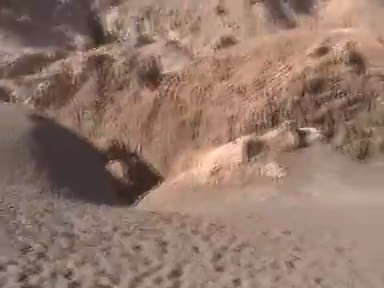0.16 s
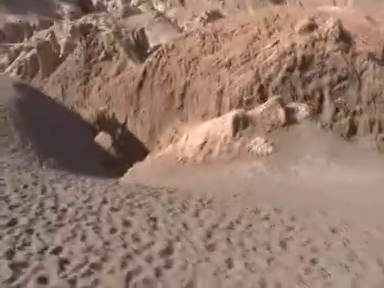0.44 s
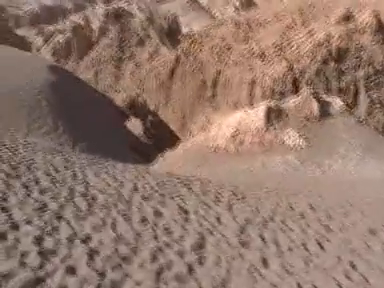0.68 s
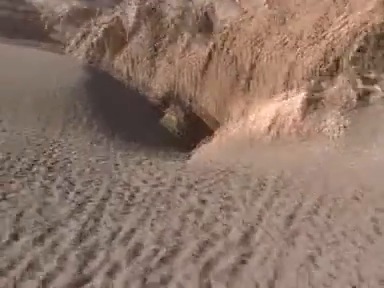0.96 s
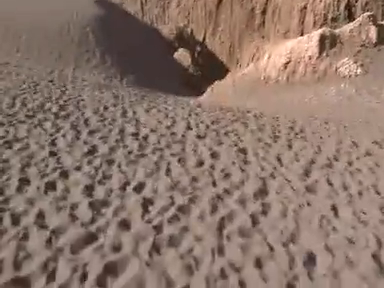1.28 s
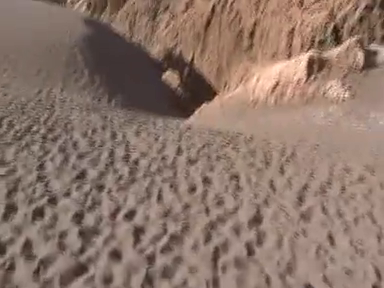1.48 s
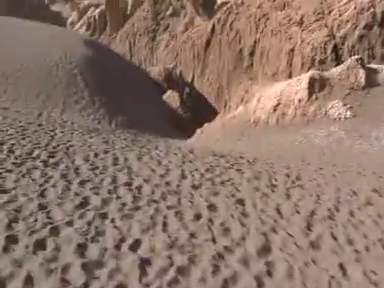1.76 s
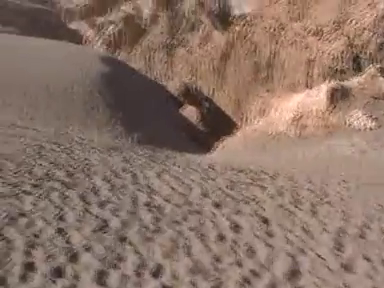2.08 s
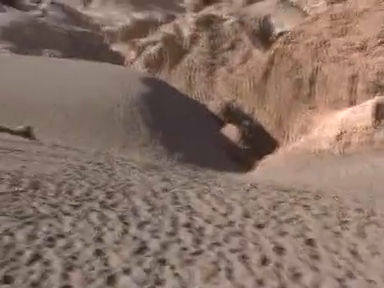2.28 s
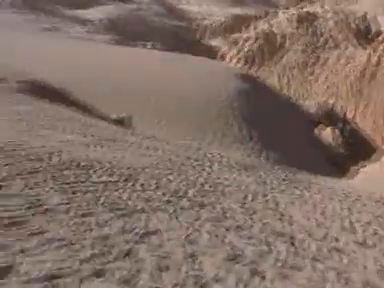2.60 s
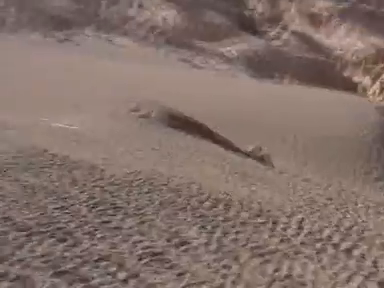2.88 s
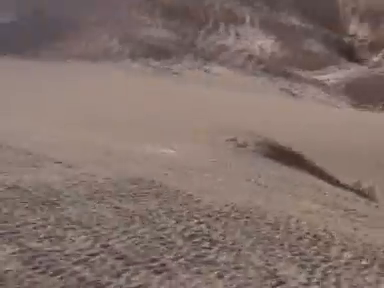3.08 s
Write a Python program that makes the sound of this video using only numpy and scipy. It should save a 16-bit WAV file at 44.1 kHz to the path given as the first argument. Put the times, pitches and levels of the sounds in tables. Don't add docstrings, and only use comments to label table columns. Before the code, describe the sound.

Strong wind roars and flutters against a small microphone in open desert, with sharp ticks and crackles.

```python
import sys
import numpy as np
from scipy import signal
from scipy.fft import rfft, irfft
from scipy.io import wavfile
from scipy.ndimage import uniform_filter1d

SR = 44100
rng = np.random.default_rng(int(sys.argv[2]) if len(sys.argv) > 2 else 0)


def dump(signal):
    limited = np.clip(np.atleast_2d(signal).T, -1, 1)
    pcm = np.round(limited * 32767).astype(np.int16)
    wavfile.write(sys.argv[1], SR, pcm)


def level_to_linear(level):
    exponent = np.asarray(level, float) / 20
    return 10 ** exponent


N = 143325
STEP = 32


def rms_one(x):
    return x / np.sqrt(np.mean(x ** 2) + 1e-20)


def coarse():
    return np.arange(N // STEP + 2) * STEP / SR


def fine(control):
    return np.interp(np.arange(N) / SR, coarse(), control)


def at_hz(points, hz):
    table_hz, values = np.array(points).T
    return np.interp(np.log(hz), np.log(table_hz), values)


def drift(rate_hz):
    pole = np.exp(-2 * np.pi * STEP * rate_hz / SR)
    run_in = 2000
    noise = rng.standard_normal(len(coarse()) + run_in)
    return rms_one(signal.lfilter([1], [1, -2 * pole, pole * pole], noise)[run_in:])


def bands(low_hz, count, colour):
    hz = np.maximum(np.fft.rfftfreq(N, 1 / SR), 1)
    spectra = rfft(rng.standard_normal((2, 2, N))) * colour(hz)
    for k in range(count):
        centre = low_hz * 2 ** (k / 2)
        octaves_off = np.clip(np.log2(hz / centre), -0.5, 0.5)
        yield centre, irfft(spectra[k % 2] * np.cos(np.pi * octaves_off), N)


def pair(two, alike):
    alike = np.clip(alike, -1, 1)
    return np.sqrt(1 + alike) * two[0] + np.sqrt(1 - alike) * two[1] * [[1], [-1]]


def air():
    # time in seconds, strength in dB, speed in octaves, lean to the left in dB.
    gusts = [(0, -17.5, 0.056, 2), (.47, -19.5, -0.54, 3), (0.602, -17, -0.42, 2), (0.782, -33.5, -1.46, 4),
             (0.869, -20, -1.28, 4), (1.031, -15.5, -0.21, 2.5), (1.28, -16.5, 0.19, 2),
             (1.411, -20.5, 0.2, 0.5), (1.701, -16.5, -0.19, 2), (1.82, -13, 0.45, 2),
             (2.07, -22, -0.22, 2.5), (2.25, -20, -0.32, 3), (2.4, -14, 0.37, 1.5), (2.66, -17.5, 0.79, -2),
             (2.901, -15.5, 0.82, -1), (2.958, -18.5, 0.8, -0.5), (3.17, -15, 0.64, -2.5),
             (3.25, -25, -0.013, -1)]
    # centre in seconds, half length in seconds, depth in dB, dulling in octaves.
    lulls = [(0.033, 0.025, 5, 0.79), (0.125, 0.027, -3.5, 0.085), (0.156, 0.011, 10, .4),
             (0.221, 0.015, -1, -0.11), (0.343, .02, 2, .2), (.47, 0.0055, -5.5, -0.41),
             (0.541, 0.047, 11.5, 0.13), (0.648, 0.0072, 7, -0.089), (0.679, 0.025, 0.5, -0.8),
             (0.896, 0.011, 9, 0.58), (0.955, 0.043, 7, 0.41), (1.316, 0.018, 2, -0.69),
             (1.339, 0.053, 3.5, 0.95), (1.41, 0.036, -2, -0.54), (1.53, 0.018, 2, 1),
             (1.752, 0.036, 9, 0.82), (1.797, 0.01, -1.5, -0.43), (2.015, 0.045, -1, 0.52),
             (2.08, 0.036, -7, -0.34), (2.143, 0.016, 0.5, 0.11), (2.182, 0.045, 1.5, .2),
             (2.33, 0.021, 2, 0.68), (2.377, .025, -6.5, -0.098), (2.606, 0.037, 5, 0.57),
             (2.978, 0.09, 1, .2), (3.209, 0.043, 10, 0.89)]
    seconds, *columns = np.transpose(gusts)
    db, octaves, lean = [np.interp(coarse(), seconds, column) for column in columns]
    for at, half, depth_db, dull in lulls:
        dip = np.exp(-((coarse() - at) / half) ** 2)
        db = db - depth_db * dip
        octaves = octaves - dull * dip
    ragged_octaves = 0.21 * drift(40)
    return db, octaves + ragged_octaves, lean


def buffeting(db, octaves, lean):
    # frequency in Hz, level in dB per Hz.
    eddies = [(40, 19.5), (300, 0.5), (700, -11), (1400, -23), (2400, -35.5), (3200, -47), (4200, -58),
              (12000, -100)]
    # frequency in Hz, likeness from -1 opposite to 1 alike.
    likeness = [(40, -0.47), (130, -1.055), (300, -0.91), (600, -0.79), (1300, -0.77), (2800, -0.42),
                (6000, -.3)]

    def colour(hz):
        cut_hz, cut_slope = 164.4, 7.6
        return level_to_linear(at_hz(eddies, hz)) / np.sqrt(1 + (cut_hz / hz) ** cut_slope)

    lumps_db = 2.5 * drift(48.7) + 0.83 * drift(4.5)
    loudness = at_hz(eddies, 300 / 2 ** octaves)
    wind = 0
    for k, (hz, two) in enumerate(bands(19.52, count=19, colour=colour)):
        slide = at_hz(eddies, hz / 2 ** octaves) - at_hz(eddies, hz) - loudness
        swell = lumps_db * (-0.2846 + 0.097 * min(k, 13))
        band_lumps = 1.59 * drift(12.0)
        wind = wind + fine(level_to_linear(slide + swell + band_lumps)) * pair(two, at_hz(likeness, hz))
    wind = rms_one(wind)
    pointed = 0.19
    wind = rms_one(wind * (1 + wind ** 2) ** (pointed / 2))
    half_lean = (lean + 0.45 * drift(25)) / 2
    db = db + 1.12
    return wind * [fine(level_to_linear(db + half_lean)), fine(level_to_linear(db - half_lean))]


def marks(rows, gain_db):
    clicks = np.zeros((2, N))
    late_s = 0.000987
    for seconds, peak_db, lean in rows:
        near = level_to_linear(-np.maximum([-lean, lean], 0))
        share = 2 * near / near.sum()
        clicks[:, int((seconds + late_s) * SR)] = level_to_linear(peak_db + gain_db) * share * np.sign(lean + 0.1)
    return clicks


def crackles(db, octaves):
    per_s, level_db, spread_db = 45, -21, 8.8
    born = rng.random((2, N)) < per_s * fine(4.0 ** octaves) / SR
    sizes = level_to_linear(spread_db * np.minimum(rng.exponential(1, (2, N)), 3.0))
    signs = rng.choice([-1, 1], (2, N))
    return born * sizes * signs * fine(level_to_linear(db + level_db))


def snaps(db, octaves):
    # time in seconds, peak in dB, lean to the left in dB.
    ticks = [(0.1096, -29.5, 35), (0.2732, -48.5, 16), (0.4693, -50, 19), (1.7483, -43, 0.5),
             (1.7954, -26, 16), (1.8427, -40, 3), (2.3565, -43, 14), (2.3735, -42, 14), (2.474, -39, -3),
             (2.4936, -11, -44), (2.5529, -19, 52), (2.7634, -47, -10), (2.8672, -16, 51),
             (3.1885, -45.5, -2.0)]
    # time in seconds, peak in dB, lean to the left in dB.
    crests = [(0.1234, -35, 18), (0.206, -44, 4.5), (0.4693, -25.5, 14), (0.8273, -52, 5),
              (1.0655, -32, 10), (1.129, -27, 10), (1.1514, -23, 9), (1.1903, -31, 9), (1.3036, -37, 5.5),
              (1.3573, -36, 10), (1.4054, -27.5, 15), (1.8534, -26, 0), (1.8564, -24, 3.5), (1.915, -42, 6),
              (2.0572, -26, 12), (2.1131, -35, 1), (2.3411, -30, 19), (2.389, -23, 5), (2.4094, -28, -1),
              (2.4624, -25, 9), (2.4683, -21, -13), (2.608, -31, -21), (2.6744, -25.5, 4.5),
              (2.7464, -28, -4), (2.7924, -57, 1.5), (2.8778, -21, 1.0), (2.893, -22, 4),
              (2.9126, -18.5, 5), (3.05, -25.5, -16), (3.1334, -24, -5)]
    t = np.arange(-200, 201)[None] / SR

    rise_s, recover_s = 0.0003, 0.00059
    climb = -np.exp(-np.abs(t) / rise_s)
    recovery = np.exp(-np.abs(t) / recover_s)
    snap = np.where(t < 0, climb, recovery) / 2
    thump_s = 0.00078
    snap += 0.17 * np.sin(np.pi * np.clip(t / thump_s / 2, -1, 1))

    crest_s, crest_cut_hz = 0.00031, 2200
    peak = (1 - np.abs(t) / crest_s) * np.exp(-np.abs(t) / crest_s)
    peak = signal.lfilter(*signal.butter(1, crest_cut_hz, fs=SR), peak)

    crest_clicks = marks(crests, 10.5) + crackles(db, octaves)
    snapping = signal.fftconvolve(marks(ticks, 11.5), snap, "same", axes=1)
    return snapping + signal.fftconvolve(crest_clicks, peak, "same", axes=1)


def sand():
    # time in seconds, level in dB.
    passing = [(0, -74), (.4, -69.5), (.55, -78), (.7, -73), (.76, -68), (.92, -68), (1.0, -58.5),
               (1.17, -59.5), (1.24, -71.5), (1.45, -68.5), (1.65, -64.5), (1.85, -64), (1.95, -76),
               (2.2, -76), (2.29, -64.5), (2.6, -72), (2.95, -67.5), (3.25, -65.5)]
    # frequency in Hz, level in dB per Hz.
    grain_colour = [(1500, 5), (4000, -5), (8000, -8), (13000, -18)]
    hiss = 0
    for _, two in bands(1200, count=8, colour=lambda hz: level_to_linear(at_hz(grain_colour, hz))):
        patches_db = 0.5 * drift(20.0)
        hiss = hiss + fine(level_to_linear(patches_db)) * pair(two, 0.71)
    level_db = np.interp(coarse(), *np.transpose(passing)) + 4 + drift(25.0)
    return fine(level_to_linear(level_db)) * rms_one(hiss)


def whine():
    return level_to_linear(-88.5) * np.sin(2 * np.pi * 11026 * np.arange(N) / SR)


def scene():
    db, octaves, lean = air()
    ticks = signal.lfilter(*signal.butter(2, 250, "high", fs=SR), snaps(db, octaves))
    port_filter = signal.butter(6, 5700, fs=SR, output="sos")
    wind = signal.sosfilt(port_filter, buffeting(db, octaves, lean))
    rounded = wind / (1 + wind ** 4) ** (1 / 4)
    busy = uniform_filter1d(uniform_filter1d(np.abs(ticks), size=60), size=60)
    held = np.exp(-(2.8 * 2 * busy) ** 2)
    return rounded * held + ticks + sand() + whine()


def top_cut(x):
    return signal.sosfilt(signal.butter(12, 13450, fs=SR, output="sos"), x)


def record(dry):
    topped = np.clip(dry, -0.93, 0.93)
    treble_cut = signal.cheby1(10, 0.5, 12250, fs=SR, output="sos")
    return top_cut(signal.sosfilt(treble_cut, topped))


dry = scene()
out = record(dry)
dump(out)
```